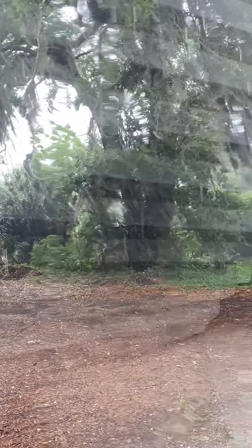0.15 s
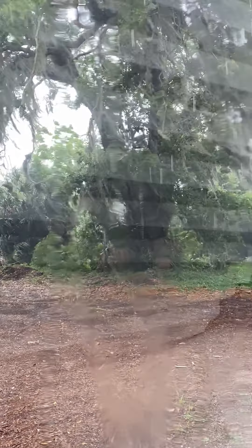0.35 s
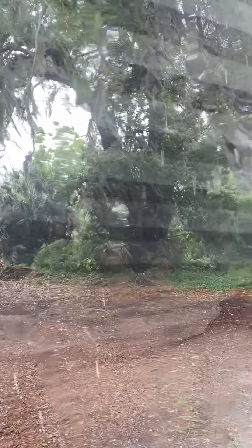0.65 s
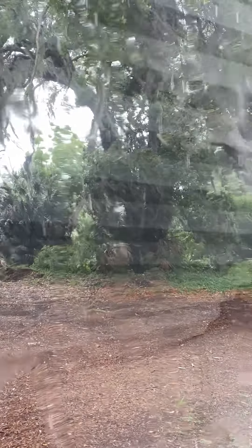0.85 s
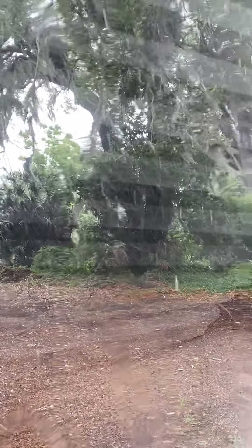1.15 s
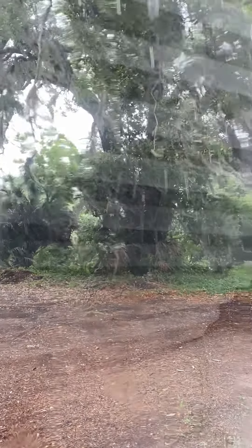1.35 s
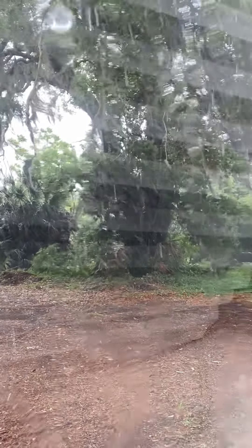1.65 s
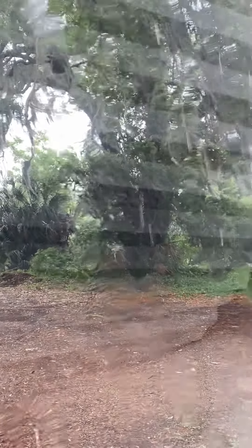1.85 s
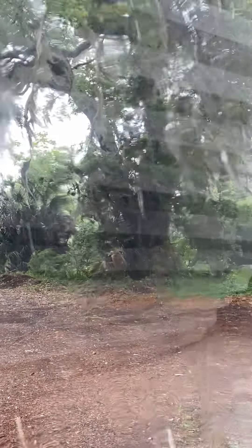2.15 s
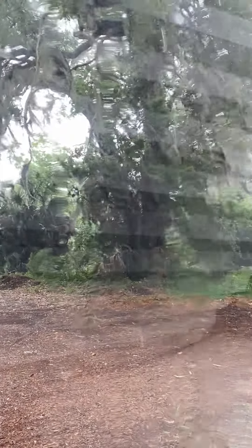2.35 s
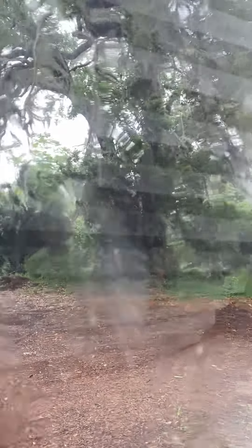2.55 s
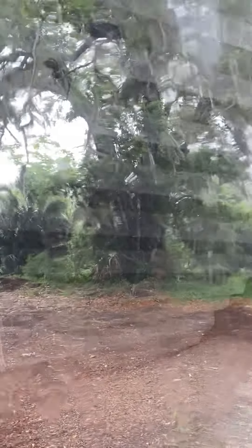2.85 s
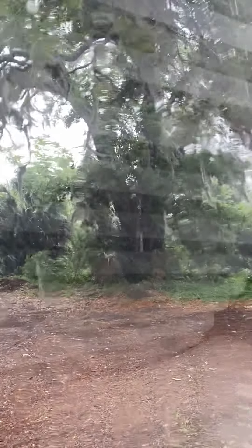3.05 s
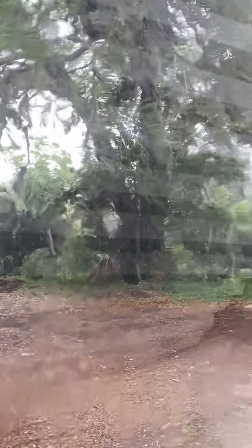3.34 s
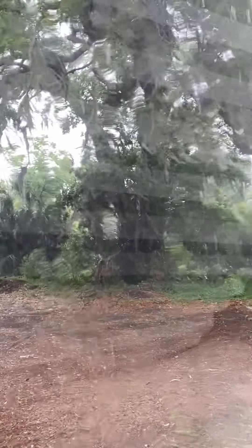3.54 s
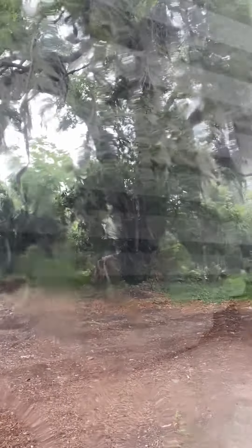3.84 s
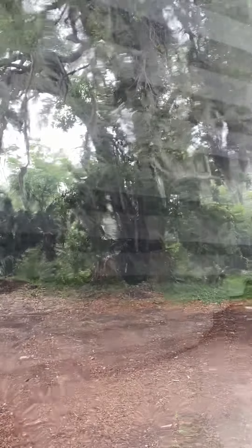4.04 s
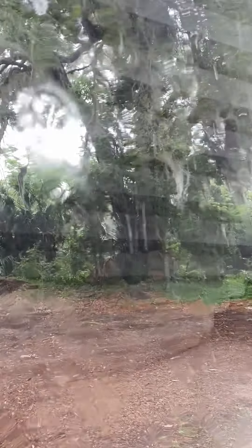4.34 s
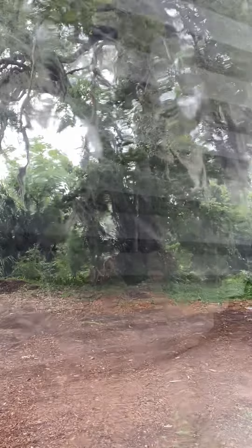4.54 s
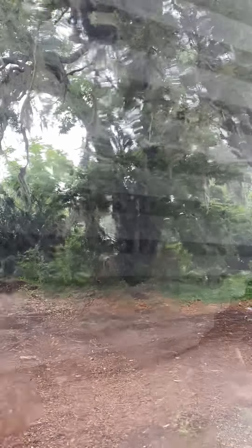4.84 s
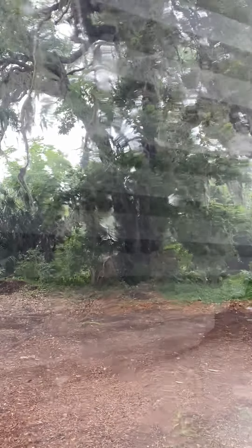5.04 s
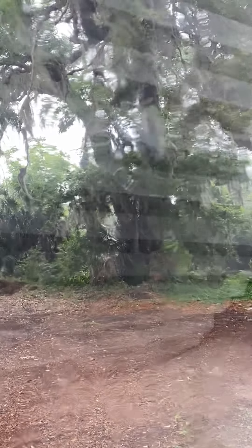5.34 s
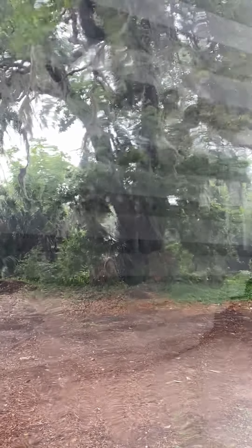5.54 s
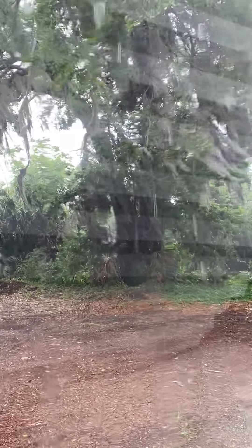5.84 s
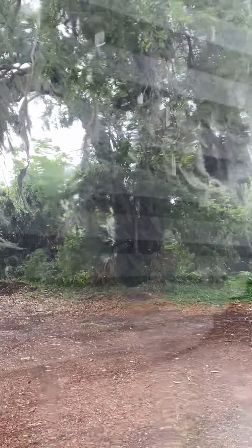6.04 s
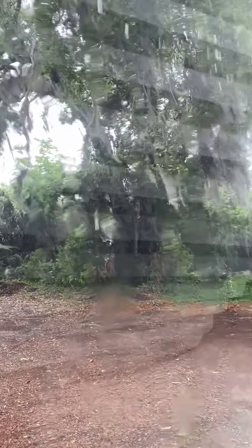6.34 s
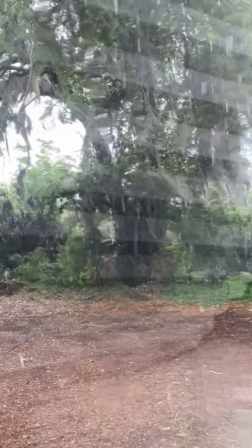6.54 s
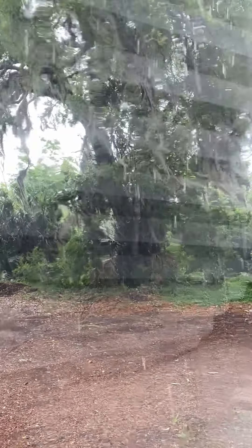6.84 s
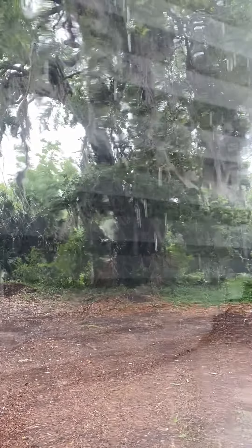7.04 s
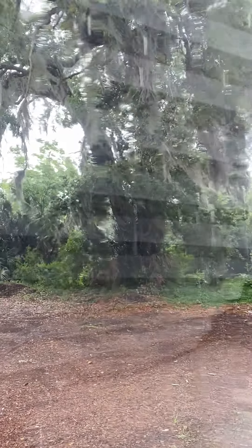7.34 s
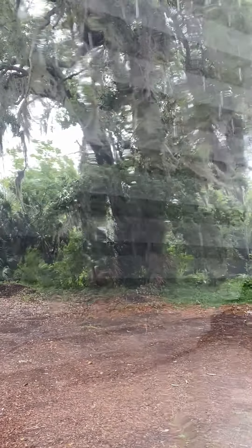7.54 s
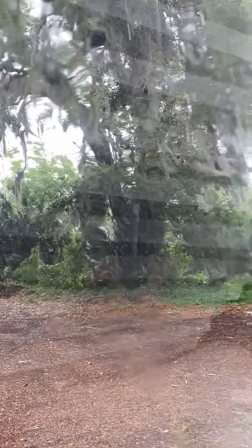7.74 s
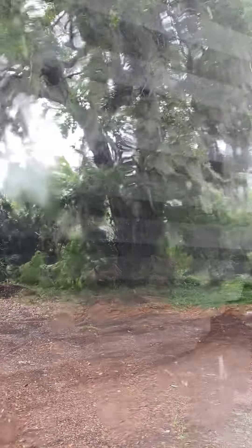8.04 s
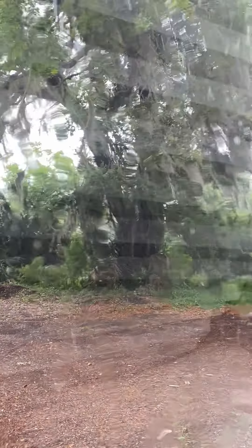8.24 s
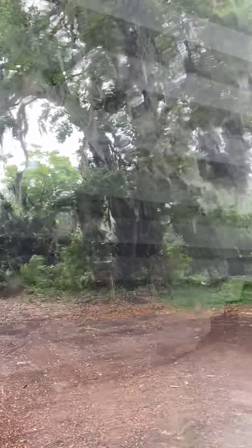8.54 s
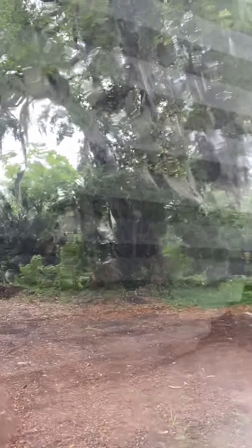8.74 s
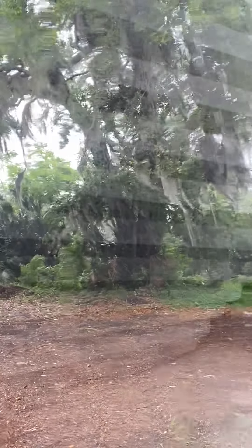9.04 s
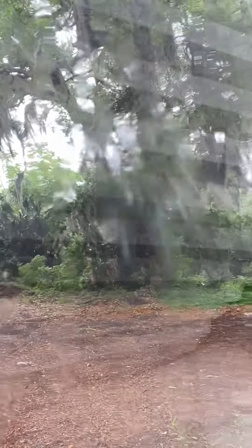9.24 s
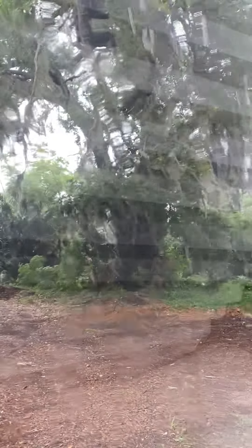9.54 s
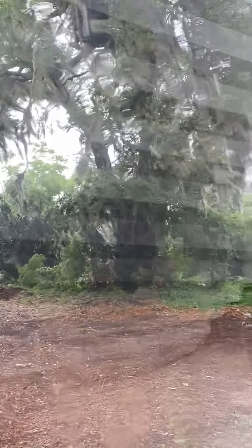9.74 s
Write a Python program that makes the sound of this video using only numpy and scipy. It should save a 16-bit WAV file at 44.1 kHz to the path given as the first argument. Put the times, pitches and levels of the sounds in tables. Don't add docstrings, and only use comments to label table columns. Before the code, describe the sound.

A stereo pair sits indoors close behind a window pane, facing rain on trees and bare ground. A soft distant rain hiss and low, rumbling wind run throughout. From 0 to 1.1 seconds there are only scattered bright ticks and a dull knock near 0.95. Spatter starts around 1.2, with a crisp splat near 1.5, and from 2 to 5 seconds clumps of drops crackle, drum and knock densely, strongest around 2.3 to 4.3. After 5.2 the spray drops away to stray taps, hiss and wind, with a very faint wavering moan from the frame at about 5.5 to 6.3. Rain returns near 7.6; a short hard thud strikes at 8.0, and clumps continue. Around 8.9 wind pushes hardest and splats cluster, with the brightest, loudest tick near 9.3. Knocks and wind continue until the end, near 9.9.

```python
import sys
import numpy as np
from scipy import signal
from scipy.fft import rfft, irfft, next_fast_len
from scipy.io import wavfile
from scipy.ndimage import uniform_filter1d

SR = 44100
rng = np.random.default_rng(int(sys.argv[2]) if len(sys.argv) > 2 else 0)


def nominal_scale(level):
    x = np.asarray(level, float) / 20
    return 10 ** x


def generate_wav(sig):
    pcm = np.round(np.clip(np.atleast_2d(sig).T, -1, 1) * 32767).astype(np.int16)
    wavfile.write(sys.argv[1], SR, pcm)


N = 436149

# (time [s], spray level [dB])
RAIN_DRIVE = [(0.0, -67.5), (0.6, -59.5), (1.2, -56), (1.56, -53), (1.81, -60.5), (1.87, -55.5),
              (2.45, -53.5), (2.95, -48.5), (4.0, -52), (4.87, -48.5), (5.53, -63.5), (7.24, -66),
              (7.6, -60), (7.7, -57), (8.2, -58.5), (8.65, -48), (9.1, -56), (9.89, -53.5)]
# (peak time [s], peak level [dB], swell [s], fade [s])
SPRAY_SHEETS = [(.32, -56, 0.28, 0.11), (1.179, -47, 0.026, 0.018), (1.299, -50, 0.027, .08),
                (1.43, -54, 0.096, 0.08), (1.54, -51.5, 0.18, 0.038), (2.121, -48.5, 0.12, 0.087),
                (2.388, -44.5, 0.2, 0.049), (2.78, -43, 0.11, 0.17), (3.41, -48, 0.8, 0.015),
                (3.692, -41, 0.2, 0.092), (3.909, -45, 0.053, 0.12), (4.071, -51, 0.035, 0.22),
                (4.919, -57, 0.67, 0.043), (5.137, -53, 0.042, 0.1), (6.221, -59, 0.27, 0.098),
                (6.47, -60.5, 0.033, 0.17), (7.701, -49, 0.016, 0.065), (7.848, -53, 0.046, .15),
                (7.992, -51.5, 0.24, .04), (8.069, -45, .04, 0.078), (8.809, -58, 0.18, 0.14),
                (8.952, -42, 0.32, 0.12), (9.141, -45.5, 0.033, 0.18), (9.4, -47, 0.088, 0.32),
                (9.78, -50.5, 0.29, 0.11)]
# (time [s], peak level [dB])
DROP_CLUMPS = [(1.2516, -49), (1.3294, -39.5), (1.857, -34.5), (1.9385, -39), (2.1949, -40.5),
               (2.2203, -49), (2.2433, -35), (2.2977, -30), (2.372, -37), (2.509, -33), (2.5566, -31),
               (2.6558, -33), (2.6803, -34), (2.7194, -34.5), (2.7821, -36), (2.8146, -25), (3.0315, -52),
               (3.2364, -26), (3.3952, -37), (3.465, -49), (3.555, -29.5), (3.6421, -45), (4.0569, -32.5),
               (4.0923, -29.5), (4.1869, -29.5), (4.2737, -38), (4.3095, -29.5), (4.4039, -41.5),
               (4.475, -37), (4.5795, -36), (4.6754, -40), (4.7027, -43), (4.793, -37), (4.8379, -39),
               (4.8623, -29.5), (4.927, -37), (5.1412, -40), (6.5829, -44), (7.649, -38), (7.6848, -50),
               (7.7364, -34), (7.8157, -37), (7.899, -32), (8.058, -34), (8.3165, -39), (8.424, -32.5),
               (8.5416, -35), (8.6208, -42), (8.7206, -42), (8.8087, -39), (8.8343, -30), (9.0658, -50),
               (9.1203, -31), (9.1875, -38), (9.2519, -28.5), (9.3606, -33), (9.4379, -34), (9.5193, -37),
               (9.5726, -38), (9.7238, -49),
               (1.2724, -38), (1.3104, -43), (1.3814, -45), (1.4104, -39), (1.5084, -39), (1.5344, -28.5),
                (1.5544, -36), (1.5958, -52), (1.9051, -38), (2.0662, -43), (2.3241, -31), (2.3394, -39),
                (2.3944, -38), (2.4394, -36), (2.5344, -30), (2.5974, -33.5), (2.804, -29), (2.8719, -37),
                (2.9592, -40), (3.0769, -43), (3.1004, -38.5), (3.1192, -27), (3.1943, -28), (3.2914, -40),
                (3.5942, -32), (3.6636, -43), (3.7294, -26), (3.8134, -35), (3.892, -30), (3.914, -33),
                (4.0214, -50), (4.0721, -29.5), (4.1224, -45), (4.1424, -44), (4.2294, -35),
                (4.3444, -37.5), (4.4283, -49), (4.6364, -37), (4.8833, -35), (4.9033, -37), (4.9444, -38),
                (5.0024, -49), (5.0454, -51), (5.1683, -34), (5.2394, -46), (7.9444, -36), (7.9942, -38)]
# (frequency [Hz], density [dB per Hz])
SPRAY_SPECTRUM = [(500, -9), (1000, 1), (1500, -5.5), (2000, -6), (2700, -3.5), (3300, -6), (4000, -4.5),
                  (5000, -4), (6000, -9), (7500, -13.5), (9000, -19.5), (12000, -54)]
# (frequency [Hz], density [dB per Hz])
MIST_SPECTRUM = [(4000, 6), (7000, 3), (9000, 6.5), (12000, 13), (14500, 1), (15700, -11), (17000, -15)]
# (frequency [Hz], density [dB per Hz])
DRUM_SPECTRUM = [(150, -2), (250, 3.5), (400, 2), (560, -0.5), (660, -2.5), (850, -8.5), (1200, -18),
                 (1600, -11), (2500, -30)]
# (time [s], peak level [dB], loudest ring [Hz])
SPLAT_TICKS = [(1.172, -30.5, 5600), (1.187, -32, 3900), (1.474, -25.5, 5760), (1.904, -34.5, 5400),
               (2.014, -29, 5340), (2.081, -32, 5060), (2.2742, -33, 4960), (2.558, -33, 3900),
               (2.9597, -34, 3850), (9.3247, -27, 4850), (3.1195, -40, 4300), (3.2344, -39, 4200),
               (3.684, -25.5, 5320), (3.8885, -29, 4100), (4.091, -43, 5100), (4.1883, -32, 5080),
               (4.274, -35.5, 3800), (4.478, -35, 3740), (4.6384, -37, 4900), (8.088, -29.5, 4800),
               (8.316, -34, 4400), (8.5413, -30, 5500), (8.863, -26.5, 4570), (8.8885, -31, 4900),
               (8.936, -24.5, 4940), (9.252, -28.5, 4400), (9.323, -21.5, 3950), (9.3922, -30, 4900),
               (9.451, -27.5, 5000), (9.637, -32, 4920), (9.753, -32, 4200)]
# (time [s], peak level [dB], loudest ring [Hz])
STRAY_DROPS = [(0.3024, -37, 2180), (1.555, -43, 1900), (1.8527, -39, 2080), (5.325, -44, 1850),
               (5.502, -42.5, 1050), (6.249, -49, 3650), (6.45, -46, 1140), (6.4837, -44, 4980),
               (6.34, -47, 1500), (7.0996, -49, 1140), (7.566, -49, 1440), (5.55, -53, 940),
               (7.36, -41.5, 1150), (7.458, -40.5, 1420), (7.6854, -46, 2260)]
# (time [s], peak level [dB], loudest ring [Hz])
BRIGHT_TICKS = [(0.177, -36, 12200), (0.481, -25.5, 9700), (0.7746, -38, 9700), (1.0148, -36, 11800),
                (1.067, -35, 11160), (1.171, -29, 12000), (1.473, -23, 10200), (1.745, -27, 8700),
                (2.014, -28.5, 11400), (2.1944, -35, 10550), (6.637, -42.5, 15400), (2.8742, -29.5, 11800),
                (2.9272, -33, 10300), (3.146, -31, 11100), (3.1742, -29, 10600), (3.3157, -31, 11460),
                (3.4745, -35, 11300), (3.683, -30, 11100), (4.2737, -25.5, 10760), (4.6084, -38, 10270),
                (5.326, -46, 9660), (6.274, -37, 8300), (6.941, -32.5, 9350), (7.9179, -36, 10700),
                (8.316, -31, 10800), (8.538, -32, 10230), (9.25, -33, 9600), (9.322, -17.5, 8400),
                (9.5423, -24.5, 10600), (9.831, -39, 10200)]
# (time [s], peak level [dB], ring [Hz])
FAINT_TICKS = [(0.3646, -48, 9430), (1.4481, -44, 11100), (1.552, -41, 11200), (1.8916, -43, 10700),
               (1.938, -39.5, 11600), (2.0822, -48, 8810), (2.4608, -48, 11100), (2.5067, -49, 10500),
               (2.5232, -38, 9720), (2.6559, -52, 9710), (2.7571, -39, 9770), (3.1208, -43, 11300),
               (3.3862, -41, 10330), (3.5392, -32.5, 11000), (3.5937, -40, 10400), (3.6626, -43, 11300),
               (3.8925, -40, 9660), (4.0575, -46, 10400), (4.1864, -48, 8580), (4.784, -42, 10400),
               (5.1402, -42, 9600), (5.445, -54, 8790), (5.5448, -47, 11800), (6.5036, -45, 9100),
               (7.0938, -50, 11000), (7.7343, -45, 9180), (8.0118, -44, 8350), (8.0591, -44, 10500),
               (8.1868, -45, 9770), (8.2147, -41, 9550), (8.8603, -39, 9540), (9.0663, -54, 9960),
               (9.3606, -50, 8990), (9.3901, -38, 9410), (9.4504, -43, 8280), (9.6325, -55, 10300)]
# (time [s], peak level [dB], ring [Hz])
DULL_KNOCKS = [(0.303, -54, 2180), (0.95, -26.5, 600), (1.948, -28, 545), (2.014, -34.5, 1110),
               (2.083, -28, 615), (2.325, -33, 670), (2.784, -24, 607), (2.872, -31, 614),
               (3.099, -27, 497), (3.233, -35, 720), (9.367, -30, 1215), (3.506, -29, 775),
               (3.558, -27.5, 670), (3.663, -26, 642), (3.943, -33.5, 660), (4.054, -37, 704),
               (4.196, -29, 1250), (4.275, -32.5, 720), (4.58, -29, 640), (4.636, -31, 595),
               (4.927, -28.5, 655), (7.848, -29.5, 1220), (8.937, -32, 653), (9.13, -29, 654),
               (9.252, -30, 637), (9.365, -29, 770), (9.438, -27, 685), (9.536, -38, 645),
               (9.769, -29.5, 648), (9.838, -33, 664)]
# (time [s], peak level [dB], ring [Hz])
LOW_TAPS = [(0.255, -45, 511), (0.774, -37, 455), (1.383, -33, 765), (1.854, -45, 436), (2.183, -29, 401),
            (2.245, -42, 670), (2.376, -32, 401), (2.463, -27.5, 404), (2.508, -36, 610), (2.682, -32, 412),
            (2.753, -28, 410), (2.959, -39, 404), (3.334, -33, 573), (3.874, -32, 453), (4.38, -35, 480),
            (4.432, -34, 425), (4.856, -28, 535), (6.24, -35, 480), (7.688, -31, 628), (7.74, -32.5, 500),
            (7.814, -45, 423), (8.062, -39, 640), (8.087, -35, 474), (8.464, -29.5, 426), (9.072, -36, 410),
            (9.753, -33, 407)]
# (time [s], peak level [dB], first pitch [Hz], spread [s], t60 [s])
PANE_THUDS = [
    (8.0117, -21.5, 3020, .0017, 0.017),
]
# (frequency [Hz], density [dB per Hz])
FAR_SPECTRUM = [(300, 0.5), (470, 4), (700, -2.5), (1200, -15.5), (2000, 1.5), (2700, 4), (3500, -1.5),
                (5000, -3.5), (7000, -7.5), (10000, -13), (15700, -16)]
# (frequency [Hz], density [dB per Hz])
ROAR_SPECTRUM = [(13, -75), (31, -69), (41, -11), (59, 6.5), (86, -3), (118, 3), (146, -4.5), (183, -1.5),
                 (246, -14.5), (281, -14), (300, -15), (390, -12.5), (480, -16), (660, -59)]
# (time [s], roar level [dB])
WIND_LEVEL = [(0.0, -47), (1.2, -43), (1.42, -44), (1.68, -45.5), (2.78, -39.5), (3.5, -43.5),
              (3.58, -35.5), (3.83, -44), (4.49, -41), (5.12, -39.5), (5.51, -45.5), (5.92, -44),
              (6.94, -47), (7.9, -43), (8.24, -43), (8.9, -42), (9.39, -41), (9.89, -41)]
# (time [s], peak level [dB])
WIND_BUFFETS = [(0.06, -47), (0.27, -42), (0.8, -38), (1.0, -44), (1.19, -44), (1.43, -34), (1.61, -47),
                (1.77, -54), (1.89, -40), (2.27, -38), (2.38, -40), (2.58, -42), (2.83, -35), (3.0, -42),
                (3.24, -38), (3.6, -42), (3.88, -38), (4.12, -35), (4.33, -42), (4.72, -35), (4.9, -43),
                (5.06, -36), (5.44, -42), (5.59, -39.5), (5.79, -41.5), (5.93, -40), (6.04, -43),
                (6.37, -46), (6.58, -43), (6.81, -44.5), (6.99, -41), (7.21, -43), (7.44, -51), (7.59, -44),
                (7.72, -41), (7.93, -38), (8.21, -42), (8.31, -46), (8.56, -37), (8.68, -35), (8.91, -29.5),
                (9.03, -32), (9.17, -33.5), (9.45, -44), (9.83, -31.5)]
# (time [s], pitch [Hz], level [dB])
GAP_MOAN = [(5.3, 372, -64), (5.5, 368, -60), (5.56, 378, -55), (5.65, 370, -57), (5.8, 380, -59),
            (5.845, 398, -49), (5.88, 380, -45.5), (5.93, 366, -60), (6.05, 376, -54), (6.12, 390, -52),
            (6.2, 372, -54), (6.25, 384, -55), (6.4, 372, -72)]
# (frequency [Hz], width [Hz], gain [dB])
PANE_RESONANCES = [(277, 34, 1), (395, 40, 2), (652, 28, 5.5), (827, 156, 3), (1202, 236, 3),
                   (1900, 110, 5), (2810, 70, 3), (3905, 170, 4), (4915, 150, 5.5)]
# (frequency [Hz], likeness [0-1], lead of the right port [rad])
PORT_PHASE = [(306, 0.92, 0.26), (510, 0.73, 0.91), (920, 0.58, 2.48), (1440, 0.47, 4.85),
              (2127, 0.31, 0.92), (2180, 0, 3.9), (3050, 0.59, 3.47), (3900, 0, 5.75), (5040, 0.56, 3.1),
              (4850, 0.63, 5.87)]
# (frequency [Hz], likeness [0-1], right lead [rad])
PATH_PHASE = [(6200, .9, 4.25), (7350, .96, 3.14), (10450, .96, 0), (12000, .96, -1.7), (12600, .97, -2.4),
              (13400, .96, -3.1), (14200, .98, -3.6), (15900, .93, -6.2)]
# (frequency [Hz], left minus right [dB])
PORT_LEAN = [(200, -1), (380, -2.5), (700, 4), (1290, 2.5), (2380, -0.5), (4400, 0.5), (7000, 1)]

SHEET_FALL_DB = 11.5
CLUMP_DB, CLUMP_SWELL_S, CLUMP_FADE_S = -11.5, 0.0011, 0.02
DRUM_DB, DRUM_SHARE = -45.5, 0.76
MIST_DB, MIST_SHARE = -65, 0.81
FAR_DB, FAR_SHARE = -54.5, 0.23
FAINT_TICK_DB, TAP_DB = 6.5, -1.5
BUFFET_DB, BUFFET_S, BED_DB = -5, 0.04, -1


def evened(x):
    return x / np.sqrt(np.mean(x ** 2) + 1e-20)


def curve(rows, column):
    rows = np.array(rows)
    return np.interp(np.arange(N) / SR, rows[:, 0], rows[:, column])


def read(points, hz):
    f, value = np.transpose(points)
    return np.interp(np.log(hz + 1), np.log(f + 1), value)


def coloured(x, points):
    size = next_fast_len(N + 4096)
    gain = nominal_scale(read(points, np.fft.rfftfreq(size, 1 / SR)))
    return evened(irfft(rfft(x, size) * gain, size)[..., :N])


def patchy(x, patchy_db, flicker_db):
    z = signal.stft(x, nperseg=512, noverlap=256)[2]
    patches = uniform_filter1d(rng.standard_normal(z.shape[1:]), size=8, axis=0)
    patches = evened(uniform_filter1d(patches, size=7, axis=1))
    flicker = evened(uniform_filter1d(rng.standard_normal(z.shape[2]), size=5))
    gain = nominal_scale(patchy_db * patches + flicker_db * flicker)
    return signal.istft(z * gain, nperseg=512, noverlap=256)[1][:, :N]


def driven_db():
    t = np.arange(0, N + 64, 64) / SR
    power = nominal_scale(2 * np.interp(t, *np.transpose(RAIN_DRIVE)))
    clumps = [(s, db + CLUMP_DB, CLUMP_SWELL_S, CLUMP_FADE_S) for s, db in DROP_CLUMPS]
    for s, db, swell, fade in SPRAY_SHEETS + clumps:
        away = np.where(t < s, (s - t) / max(swell, .001), (t - s) / max(fade, .01))
        power = power + nominal_scale(2 * (db - SHEET_FALL_DB * away))
    return np.interp(np.arange(N) / SR, t, 10 * np.log10(power))


def splashes(per_s, spread_db, decay_s):
    landed = rng.random(N) < per_s / SR
    size = nominal_scale(spread_db * np.minimum(rng.exponential(1, N), 2.8)) * landed
    power = signal.lfilter([1], [1, -np.exp(-1 / (decay_s * SR))], size ** 2)
    return np.sqrt(power + 0.032 * power.mean()) * rng.standard_normal((2, N))


def crackle(per_s, spread_db, lo_hz, hi_hz, cycles):
    landed = rng.random(N) < per_s / SR
    size = nominal_scale(spread_db * np.minimum(rng.exponential(1, N), 4)) * landed
    kind = rng.integers(0, 24, N)
    t, out = np.arange(600) / SR, np.zeros((2, N))
    for k, hz in enumerate(np.geomspace(lo_hz, hi_hz, 24)):
        phase = 2 * np.pi * (hz * t + rng.random((2, 1)))
        ring = np.sin(phase) * np.exp(-hz * t / cycles)
        out += signal.oaconvolve((size * (kind == k))[None], ring, axes=1)[:, :N]
    return evened(out)


def spray():
    swing_db = driven_db() + 50
    drops = patchy(splashes(per_s=600, spread_db=3.0, decay_s=0.0025), 1.48, 0.96)
    heavy = patchy(splashes(per_s=250, spread_db=3.5, decay_s=0.0078), 1.0, 0.84)
    hiss = nominal_scale(swing_db - 48.5) * coloured(drops, SPRAY_SPECTRUM)
    fizz = nominal_scale(MIST_DB + MIST_SHARE * swing_db) * coloured(drops, MIST_SPECTRUM)
    landings = evened(heavy) + 0.76 * evened(drops)
    drum = nominal_scale(DRUM_DB + DRUM_SHARE * swing_db + 1.0) * coloured(landings, DRUM_SPECTRUM)
    small = crackle(per_s=570, spread_db=4.0, lo_hz=1093, hi_hz=6070, cycles=2.5)
    patter = nominal_scale(swing_db - 56.5) * small
    return hiss + fizz + drum + patter


def blows(rows, lo_hz, hi_hz, burst_db, push_db, rise_s):
    out, t = np.zeros((2, N + 3000)), np.arange(3000) / SR
    band = signal.butter(2, [lo_hz, hi_hz], "bandpass", fs=SR, output="sos")
    push = signal.sosfilt(band, (t == 0).astype(float))
    push = nominal_scale(push_db) * push / abs(push).max()
    for s, db, hz, t60 in rows:
        draw = rng.random((2, 2, 6))
        pitch = lo_hz * (hi_hz / lo_hz) ** draw[:, 0]
        pitch[:, 0] = hz
        height = nominal_scale(-8 * draw[:, 1] - 5.0)
        height[:, 0] = 1
        rings = (height[..., None] * np.sin(2 * np.pi * pitch[..., None] * t)).sum(1)
        rings = rings * nominal_scale(-60 * t / max(t60, .003))
        splash = evened(signal.sosfilt(band, rng.standard_normal((2, len(t)))))
        splash = nominal_scale(burst_db) * splash * nominal_scale(-60 * t / max(2.2 * t60, .003))
        sound = (rings + splash) * np.minimum(t / rise_s, 1) + push
        at = round(s * SR)
        out[:, at:at + len(t)] += nominal_scale(db) * sound / abs(sound[0]).max()
    return out[:, :N]


def single_drops():
    splats = [row + (.02,) for row in SPLAT_TICKS]
    loose = [row + (.025,) for row in STRAY_DROPS]
    fine = [row + (.017,) for row in BRIGHT_TICKS]
    fine += [(s, db + FAINT_TICK_DB, hz, .014) for s, db, hz in FAINT_TICKS]
    dull = [row + (.034,) for row in DULL_KNOCKS]
    dull += [(s, db + TAP_DB, hz, .026) for s, db, hz in LOW_TAPS]
    ticks = blows(splats, lo_hz=3595, hi_hz=6320, burst_db=-3.5, push_db=0, rise_s=0.00049)
    strays = blows(loose, lo_hz=922, hi_hz=6750, burst_db=-1.5, push_db=-9, rise_s=0.0006)
    pins = blows(fine, lo_hz=6570, hi_hz=15840, burst_db=5.0, push_db=-20, rise_s=0.00057)
    knocks = blows(dull, lo_hz=328, hi_hz=1250, burst_db=-10.0, push_db=-8.5, rise_s=0.003)
    return nominal_scale(-1.0) * ticks + nominal_scale(4) * strays + nominal_scale(-3.5) * pins + nominal_scale(-2.0) * knocks


def thuds():
    out, t = np.zeros((2, N + 1500)), np.arange(1500) / SR
    for s, db, top_hz, spread, t60 in PANE_THUDS:
        sweep = np.sin(2 * np.pi * top_hz * t / (1 + t / spread))
        at = round(s * SR)
        out[:, at:at + len(t)] += nominal_scale(db - 60 * t / t60) * sweep * np.minimum(t / 0.00034, 1)
    return out[:, :N]


def far_rain():
    swell_db = uniform_filter1d(driven_db(), size=30000)
    hiss = coloured(patchy(rng.standard_normal((2, N)), 1.0, 0.6), FAR_SPECTRUM)
    return nominal_scale(FAR_DB + FAR_SHARE * (swell_db - swell_db.mean())) * hiss


def roar():
    air = coloured(patchy(rng.standard_normal((2, N)), 0.75, 0.16), ROAR_SPECTRUM)
    local_power = uniform_filter1d(uniform_filter1d(air ** 2, size=3000), size=3000)
    air = air / np.sqrt(local_power + 0.051)
    t = np.arange(0, N + 64, 64) / SR
    pushes = sum(nominal_scale(2 * (db + BUFFET_DB)) * np.exp(-((t - s) / BUFFET_S) ** 2) for s, db in WIND_BUFFETS)
    bed = nominal_scale(2 * (curve(WIND_LEVEL, column=1) + BED_DB))
    return np.sqrt(bed + np.interp(np.arange(N) / SR, t, pushes)) * air


def moan():
    t = np.arange(N) / SR
    turn = np.exp(2j * np.pi * np.cumsum(curve(GAP_MOAN, column=1)) / SR)
    r = np.exp(-np.pi * 45 / SR)
    breath = rng.standard_normal((2, N)) / turn
    for _ in range(2):
        breath = signal.lfilter([1 - r], [1, -r], breath)
    core_and_breath = .4 + .7 * breath / breath.std()
    inside = (t > GAP_MOAN[0][0]) & (t < GAP_MOAN[-1][0])
    return inside * nominal_scale(curve(GAP_MOAN, column=2)) * evened((turn * core_and_breath).real)


def room(x, wet_db, t60, damp_hz):
    t = np.arange(6000) / SR
    tail = rng.standard_normal((2, len(t))) * nominal_scale(-60 * t / max(t60, .02)) * (t > .002)
    tail = nominal_scale(wet_db) * tail / np.linalg.norm(tail, axis=1, keepdims=True)
    size = next_fast_len(N + 8192)
    hz = np.fft.rfftfreq(size, 1 / SR)
    pane_db = sum(db / (1 + (2 * (hz - f) / width) ** 2) for f, width, db in PANE_RESONANCES)
    walls = 1 + rfft(tail, size) / (1 + (hz / damp_hz) ** 2)
    return irfft(rfft(x, size) * walls * nominal_scale(pane_db - 2.0), size)[:, :N]


def scene():
    rain = spray() + single_drops() + thuds() + far_rain()
    wind = roar() + moan()
    return room(rain, wet_db=-12, t60=.08, damp_hz=4000) + wind


def band_limit(x):
    return signal.sosfilt(signal.butter(12, 17000, fs=SR, output="sos"), x)


def record(dry):
    size = next_fast_len(N + 4096)
    hz = np.fft.rfftfreq(size, 1 / SR)
    f, like, lead = np.transpose([(60, .999, 0), (130, .995, 0)] + PORT_PHASE + PATH_PHASE)
    like = np.clip(np.interp(hz, f, like), 0, 1)
    left, other = rfft(dry, size)
    right = like * np.exp(1j * np.interp(hz, f, lead)) * left + np.sqrt(1 - like ** 2) * other
    lean = nominal_scale(read([(120, 0)] + PORT_LEAN, hz) / 2)
    ports = irfft(np.array([left * lean, right / lean]), size)[:, :N]
    return band_limit(ports)


dry = scene()
out = record(dry)
generate_wav(out)
```